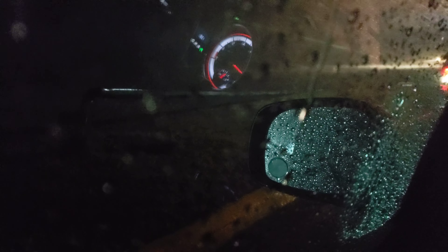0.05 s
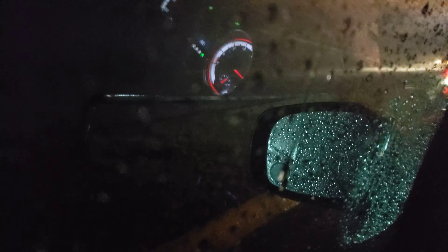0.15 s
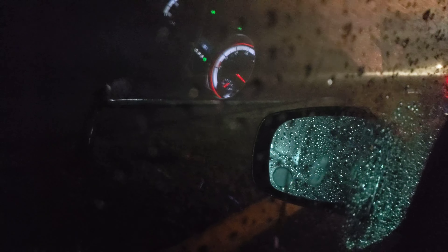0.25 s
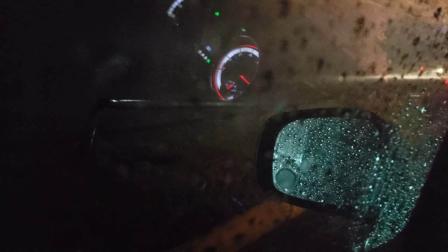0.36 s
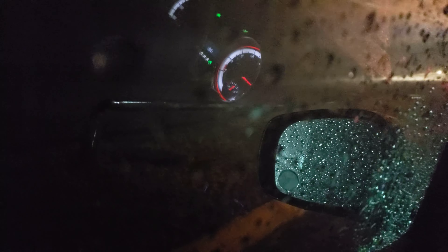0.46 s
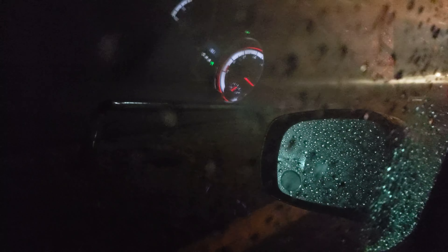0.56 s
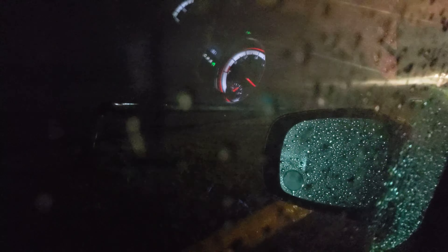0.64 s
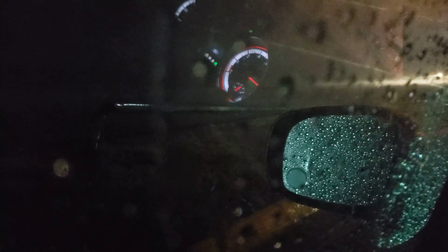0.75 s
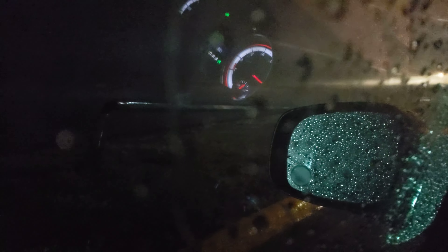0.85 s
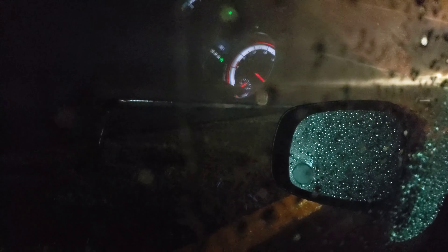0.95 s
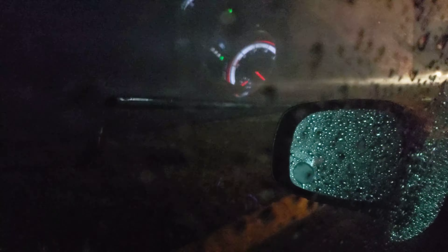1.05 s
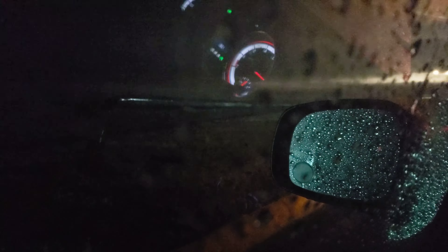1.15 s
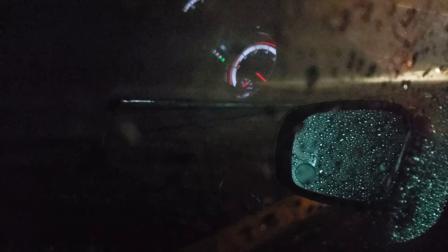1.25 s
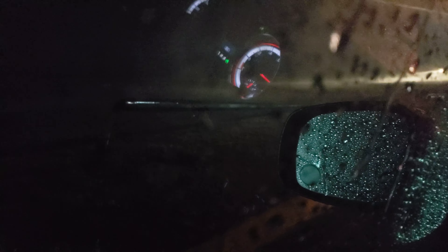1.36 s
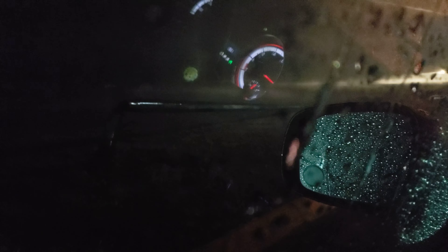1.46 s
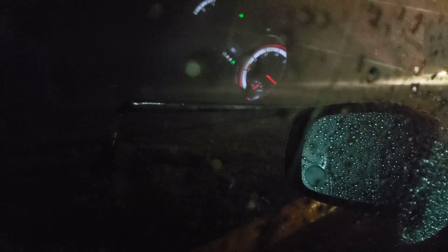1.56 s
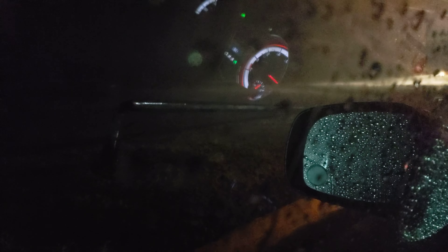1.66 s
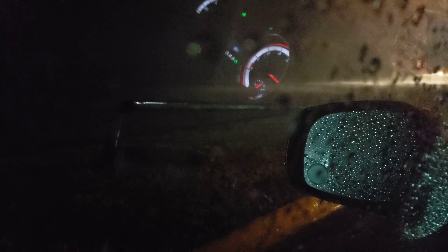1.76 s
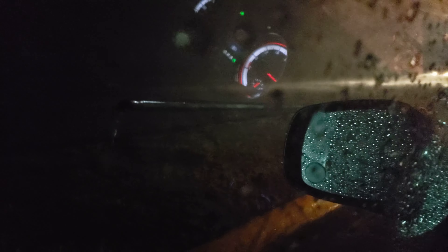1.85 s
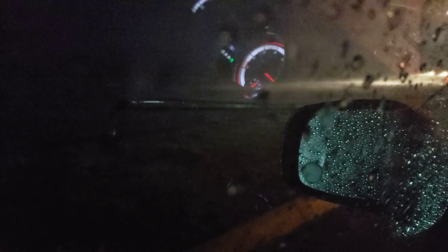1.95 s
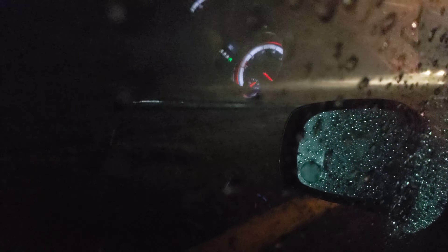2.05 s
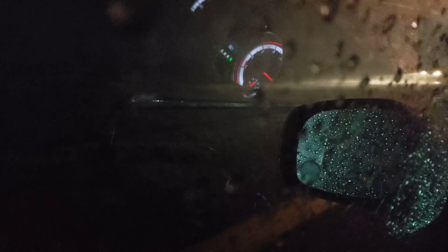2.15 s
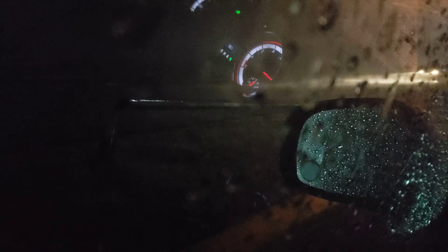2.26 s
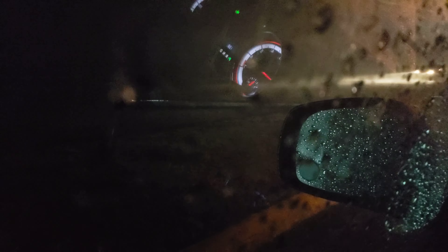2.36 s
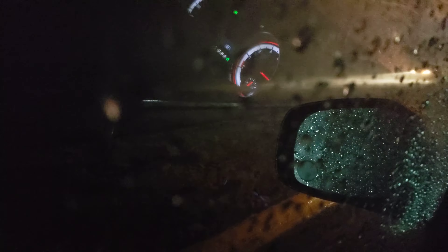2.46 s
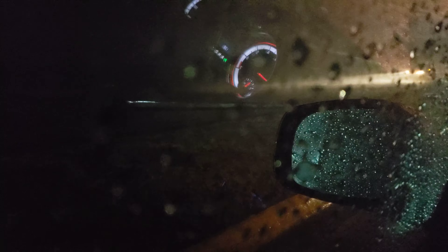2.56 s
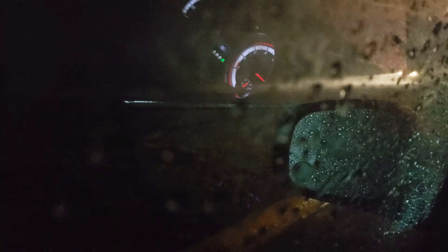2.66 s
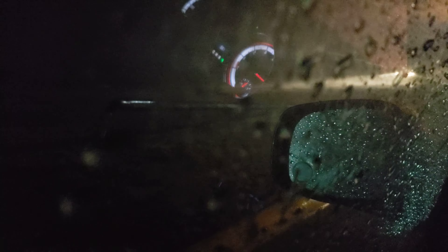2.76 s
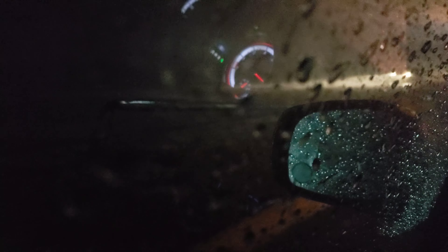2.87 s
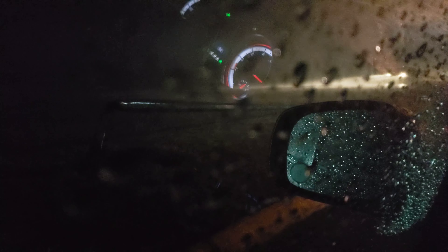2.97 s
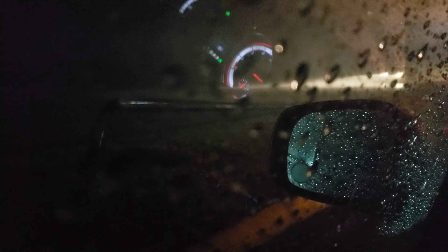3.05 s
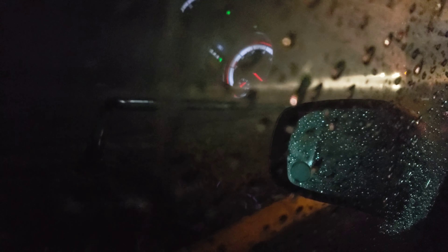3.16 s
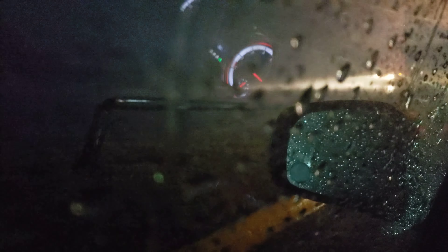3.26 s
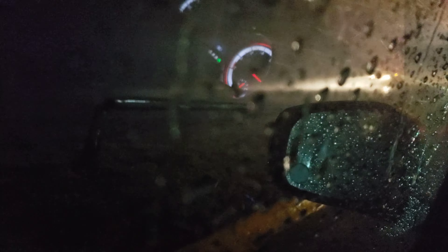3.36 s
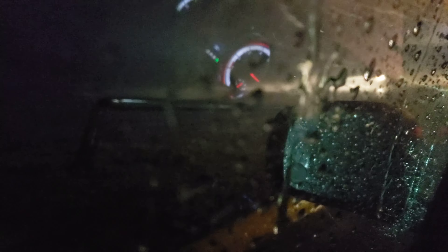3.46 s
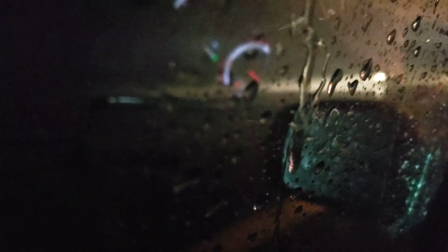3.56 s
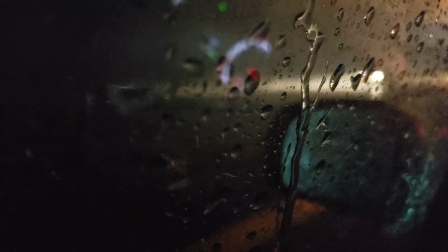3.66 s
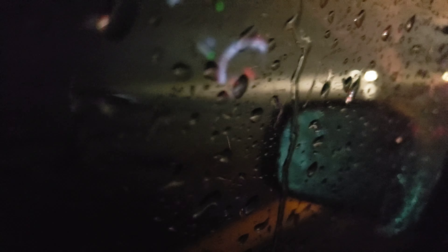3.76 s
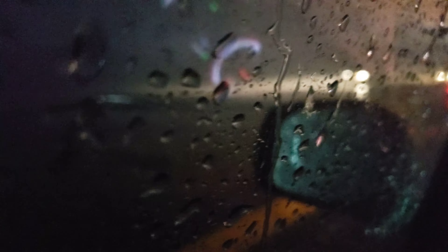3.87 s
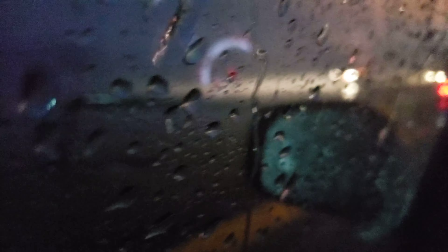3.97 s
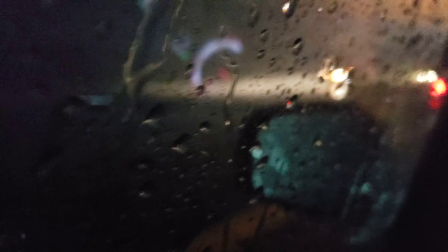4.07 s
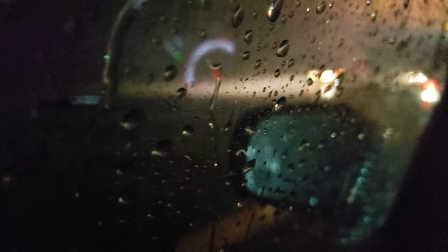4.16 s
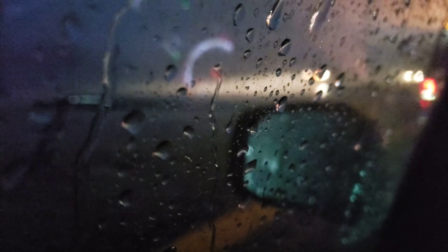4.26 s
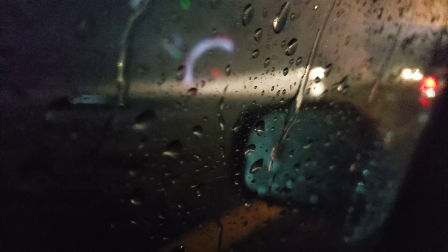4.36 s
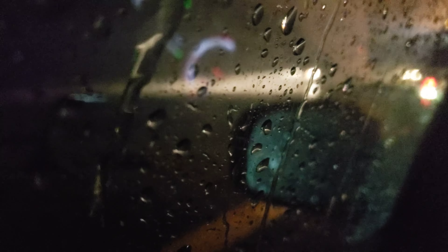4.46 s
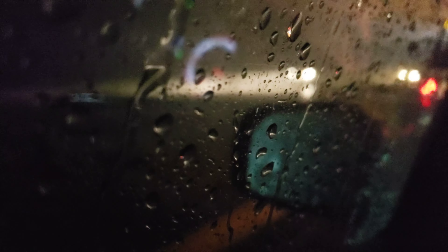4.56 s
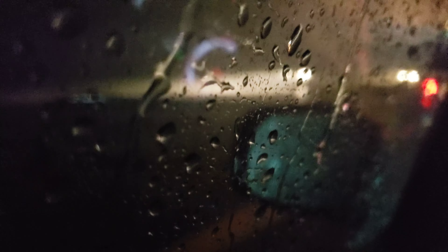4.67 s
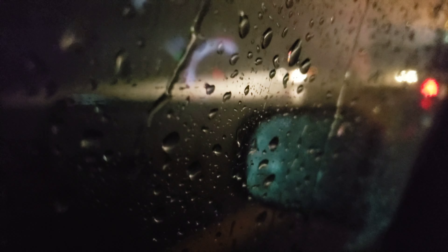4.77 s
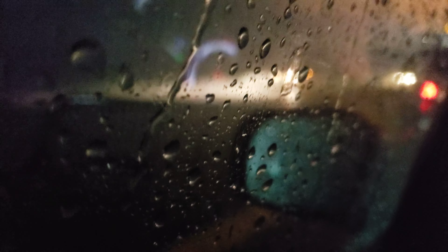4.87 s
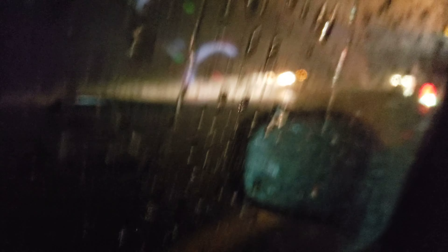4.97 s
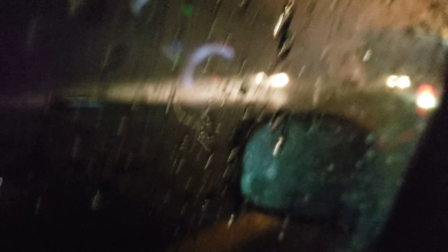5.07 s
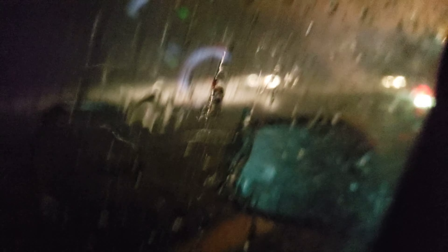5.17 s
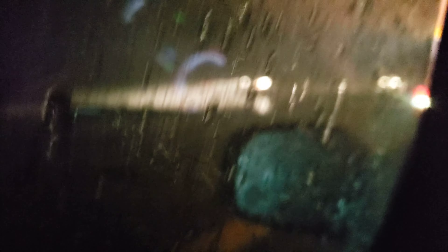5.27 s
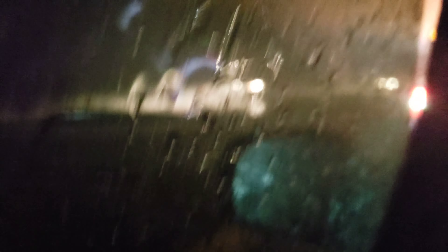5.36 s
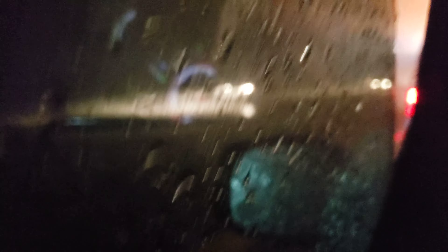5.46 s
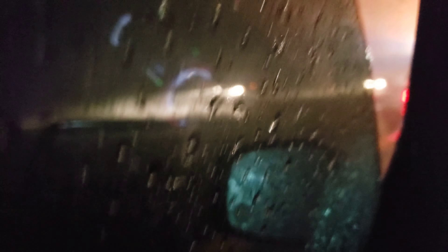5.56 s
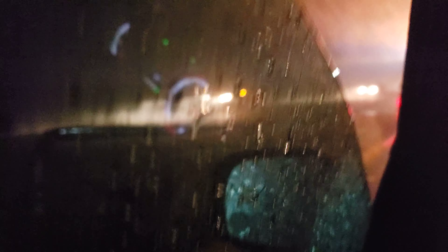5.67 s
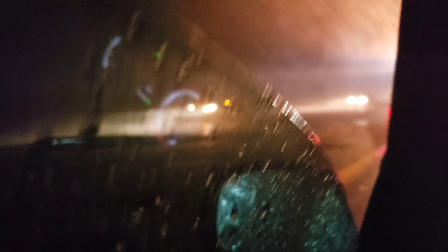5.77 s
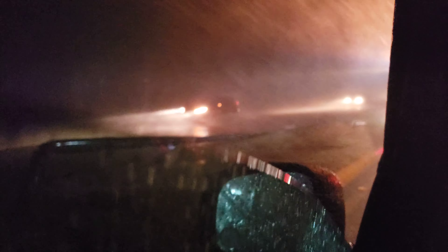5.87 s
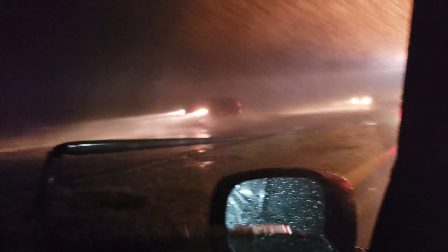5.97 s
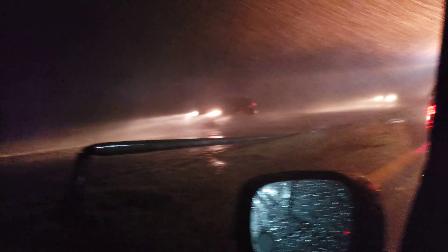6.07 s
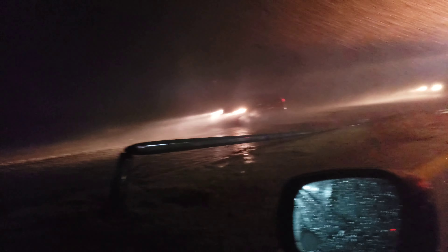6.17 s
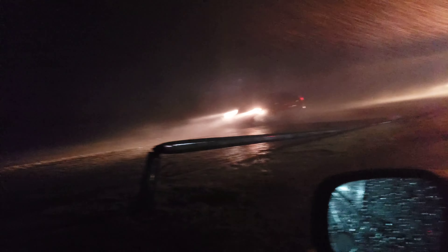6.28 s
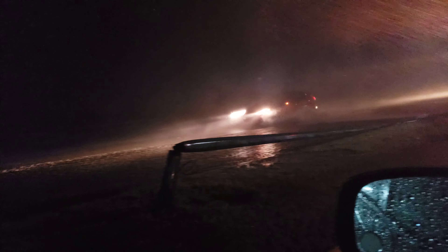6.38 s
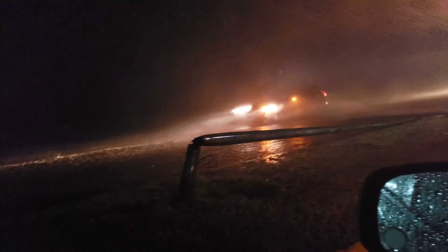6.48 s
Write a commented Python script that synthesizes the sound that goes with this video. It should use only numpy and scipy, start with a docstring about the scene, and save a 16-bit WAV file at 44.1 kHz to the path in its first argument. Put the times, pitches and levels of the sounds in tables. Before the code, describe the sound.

Close stereo cabin sound: rain hisses and spatters in gusts with brief lulls, crisp indicator clicks and dull wiper thuds above a soft drone. Late on, the door thuds as the window lowers, a breathy tone sings briefly in the gap, and rain rushes in. Drops pepper the microphone until a hard hit on the left leaves near silence.

```python
"""Sheets of rain burst on the glass of a vehicle at night, over a low rumble; an indicator relay ticks
and wipers thump as they turn. The side window is let down and the rain and air come in louder.
At last a drop lands on the left microphone port, and a limiter ducks all that follows to a whisper.
Rain is random impulses shaped by filters, rumble and air tone are filtered noise, and knocks and
ticks are impulses ringing damped modes."""
import sys
import numpy as np
from scipy import signal
from scipy.fft import rfft, irfft, next_fast_len
from scipy.io import wavfile
from scipy.ndimage import uniform_filter1d

SR = 44100
rng = np.random.default_rng(int(sys.argv[2]) if len(sys.argv) > 2 else 0)


def wav_record(signal):
    """Record a signal, one row per channel, as 16-bit PCM in the file named by sys.argv[1]."""
    frames = np.transpose(np.atleast_2d(signal))
    bounded = np.clip(frames, -1, 1)
    # unit amplitude maps onto the largest positive 16-bit level
    quanta = np.round(bounded * 32767).astype(np.int16)
    wavfile.write(sys.argv[1], SR, quanta)


N = 287612
TIME = np.arange(N) / SR   # seconds
FFT_SIZE = next_fast_len(N + SR // 4, real=True) // 2 * 2
BINS_HZ = np.maximum(np.arange(FFT_SIZE // 2 + 1) * SR / FFT_SIZE, 1)


def from_db(db):
    """Amplitude ratio: 20 dB is a factor of ten."""
    return 10 ** (np.asarray(db) / 20)


def rms(x):
    """Root mean square, the amplitude of equal power."""
    return np.sqrt(np.mean(x ** 2) + 1e-20)


def in_time(rows):
    """Linear interpolation of each column of a curve, at every sample."""
    seconds, *columns = np.transpose(rows)
    return [np.interp(TIME, seconds, column) for column in columns]


def per_bin(points):
    """Interpolation over log frequency, as pitch is heard, at every bin."""
    hz, value = np.transpose(points)
    return np.interp(np.log(BINS_HZ), np.log(hz), value)


def butter(x, hz, kind, order=2):
    """Butterworth filter: maximally flat in its passband."""
    return signal.sosfilt(signal.butter(order, hz, kind, fs=SR, output="sos"), x + 1e-18)


def ring(x, hz, t60):
    """Damped resonance: a unit click starts a sine of height 1 that falls 60 dB in t60 seconds."""
    radius, angle = from_db(-60 / (t60 * SR)), 2 * np.pi * hz / SR
    return signal.lfilter([0, np.sin(angle)], [1, -2 * radius * np.cos(angle), radius * radius], x + 1e-18)


def click(s, db):
    """Impulse: one sample, equal energy at all frequencies."""
    out = np.zeros(N)
    out[round(s * SR)] = from_db(db)
    return out


def drift(per_s):
    """Slow random fluctuation of RMS 1, with per_s new random values a second."""
    knots = rng.standard_normal(4096)
    slow = np.interp(TIME * per_s, np.arange(len(knots)), knots)
    return slow / rms(slow)


# Correlation of the ears. Each row: frequency in Hz, left-right likeness (limited to 1).
EAR_LIKENESS = [(60, 1.3), (240, 0.8), (480, 0.73), (950, 0.2), (1900, -0.1), (8000, 0)]
# Level difference of the ears. Each row: frequency in Hz, left minus right in dB.
EAR_BALANCE = [(60, 2.3), (240, 2.5), (480, 3.5), (950, 6), (1900, -1.5), (3800, -1), (6500, -7.5),
               (9800, 2.5), (12000, -9.5), (15000, -9)]


def in_cabin(pair, spectrum_db):
    """Interaural correlation: two unrelated signals are blended, alike in the bass, and filtered causally."""
    first, second = rfft(pair, FFT_SIZE)
    blend = np.arcsin(np.clip(per_bin(EAR_LIKENESS), -1, 1)) / 2
    ears = np.cos(blend) * np.array([first, second]) + np.sin(blend) * np.array([second, first])
    # folding the cepstrum gives the minimum-phase filter of this spectrum
    cepstrum = irfft(np.log(from_db(spectrum_db)))
    cepstrum[1:FFT_SIZE // 2] *= 2
    cepstrum[FFT_SIZE // 2 + 1:] = 0
    lean = from_db(per_bin(EAR_BALANCE) * np.array([[1], [-1]]) / 2)
    lean = lean / np.sqrt(np.mean(lean ** 2, axis=0))
    return irfft(ears * lean * np.exp(rfft(cepstrum)))[:, :N]


WINDOW_OPENS_S, WINDOW_TRAVEL_S = 4.925, 0.075


def window_opening():
    """Aperture as a share from 0 to 1, growing linearly."""
    return np.clip((TIME - WINDOW_OPENS_S) / WINDOW_TRAVEL_S, 0, 1)


# Sheets of rain thrown by gusts. Each row: time of full strength in seconds, patter level in dB,
# hold in seconds, rise in dB per second, fall in dB per second, extra fine spray in dB.
RAIN_SHEETS = [(0.01, -60.5, 0.009, 118, 89, 0), (0.30, -44, .2, 95, 65, 1),
               (0.681, -51, 0.0092, 120, 43, 0.5), (1.24, -55.5, 0.096, 39, 68, -1),
               (1.502, -62.3, 0.097, 49, 135, 0.5), (1.847, -45, 0.18, 215, 52, -2),
               (2.218, -37.5, 0.017, 220, 123, 1), (2.396, -44.5, 0.028, 99, 55, 2),
               (2.629, -40.5, .1, 276, 79, .5), (3.17, -52.5, 0.13, 150, 28.5, -1.5),
               (3.571, -48.5, .25, 40, 63, -0.5), (4.016, -56.5, .02, 100, 63, -1),
               (4.28, -56.5, .17, 160, 83, 5), (4.785, -55, 0.024, 41, 43, 1.5),
               (5.005, -42, 0.0079, 250, 111, -2), (5.177, -42.5, 0.12, 150, 48, -1),
               (5.63, -45, 0.033, 397.5, 100, 10.5), (5.69, -44, 0.022, 70, 100, -2),
               (5.99, -47.5, .5, 150, 40, 0)]
DRIZZLE_DB, INFLOW_DB = -79, -46   # rain between the sheets; rain blowing in at the open window
SPRAY_SHUT_DB, SPRAY_OPEN_DB = -8, -2.5   # fine spray against the patter


def sheets():
    """Addition of powers: sheets swell, hold and drain, giving gains of patter and fine spray."""
    opening = window_opening()
    patter = spray = from_db(DRIZZLE_DB) ** 2 + (from_db(INFLOW_DB) * opening) ** 2
    for s, db, hold, rise, fall, fine_db in RAIN_SHEETS:
        before, after = np.maximum(s - TIME, 0), np.maximum(TIME - s - hold, 0)
        level_db = db - rise * before - fall * after
        power = from_db(np.maximum(level_db, -150)) ** 2
        patter = patter + power
        spray = spray + power * from_db(fine_db) ** 2
    share_db = SPRAY_SHUT_DB + opening * (SPRAY_OPEN_DB - SPRAY_SHUT_DB)
    return np.sqrt(patter), np.sqrt(spray) * from_db(share_db)


def drops(per_s, spread_db, mist):
    """Shot noise: impacts of many sizes, each nearer one ear, over a mist too fine to tell apart."""
    sizes = from_db(spread_db * np.minimum(rng.exponential(1, N), 5)) * rng.choice([-1, 1], N)
    chance = np.clip(per_s / SR, 1e-4, 1)
    bearing = rng.uniform(0, 2 * np.pi, N)
    lands = rng.random(N) < chance
    impacts = sizes * lands / np.sqrt(chance)   # power does not depend on the rate
    hits = impacts * np.array([np.cos(bearing), np.sin(bearing)])
    return hits / rms(hits) + mist * rng.standard_normal((2, N))


# Spectra of the patter, window shut and open, and of the fine spray.
# Each row: frequency in Hz, relative level in dB per Hz.
SHUT_PATTER = [(120, 2), (300, 3.5), (620, 2), (900, -0.5), (1300, -1.5), (1800, -2.5), (2500, -3.5),
               (3300, -2), (4000, -5), (5000, -12), (6200, -15.5), (7500, -23), (9000, -21)]
OPEN_PATTER = [(90, -0.5), (300, -0.5), (620, 1), (900, -2), (1300, -1.5), (1800, -3.5), (2500, -5.5),
               (3300, -2.5), (4000, -6), (5000, -8.5), (6200, -14), (7500, -18.5), (9000, -23)]
FINE_SPRAY = [(6000, -45), (8000, -18), (8900, -7), (9600, 0.5), (10600, -1), (12500, 1), (14000, -6),
              (15700, -16.5), (17000, -35)]
# Lift of the spray through the open window. Each row: frequency in Hz, gain in dB.
OPEN_SPRAY_LIFT = [(12500, 2), (14000, 4.5), (15400, 8.5)]
# Glass and cabin resonances under the rain. Each row: frequency in Hz, width in Hz, boost in dB.
GLASS_RESONANCES = [(2098, 230, 6.5), (2825, 210, 3), (10640, 71, 6.5)]
# Heavy splats on the glass. Each row: start in seconds, patter level in dB and spray level in dB
# (both before SPLAT_LIFT_DB and the envelope), decay in seconds.
HEAVY_SPLATS = [(0.107, -49.5, -58, 0.01), (0.509, -39.5, -50, 0.01), (1.348, -48, -50.5, 0.0026),
                (2.054, -42, -48, 0.0054), (3.598, -40, -44, .011), (3.6847, -40, -35, 0.0035),
                (3.801, -44, -43, 0.0067), (4.775, -40, -44, 0.014), (5.591, -40, -34.5, 0.004),
                (5.745, -26, -31, 0.0016)]
SPLAT_LIFT_DB = 2.5


def rain(patter_gain, spray_gain):
    """Density of impacts: stronger gusts bring more drops, the open window a brighter sound, splats brief showers."""
    opening = window_opening()
    per_s = 4000 * (patter_gain / from_db(-48)) ** .7
    clumps = from_db(1.17 * drift(per_s=70) + 0.65 * drift(per_s=18))
    pane_db = sum(db / (1 + (2 * (BINS_HZ - hz) / width) ** 2) for hz, width, db in GLASS_RESONANCES)

    def through_window(impacts, shut_db, open_db):
        """Crossfade of transmission: from the colour of closed glass to that of the open gap."""
        shut = in_cabin(impacts, shut_db + pane_db)
        return (1 - opening) * shut + opening * in_cabin(impacts, open_db + pane_db)

    patter_drops = drops(per_s, spread_db=2.5, mist=0.79)
    patter = through_window(patter_drops, per_bin(SHUT_PATTER), per_bin(OPEN_PATTER))
    spray_drops, spray_db = drops(per_s, spread_db=3.0, mist=0.99), per_bin(FINE_SPRAY)
    spray = through_window(spray_drops, spray_db, spray_db + per_bin(OPEN_SPRAY_LIFT))
    patter = patter / rms(butter(patter, [1000, 7000], "band"))   # level set by the middle band
    for s, splat_db, splash_db, decay in HEAVY_SPLATS:
        age = np.clip((TIME - s) / decay, 0, 20)
        shower = np.exp(-age) - np.exp(-8 * age)   # the sheet of water spreads, then drains
        patter_gain = np.hypot(patter_gain, from_db(splat_db + SPLAT_LIFT_DB) * shower)
        spray_gain = np.hypot(spray_gain, from_db(splash_db + SPLAT_LIFT_DB) * shower)
    return clumps * (patter_gain * patter + spray_gain * spray / rms(spray))


# Spectrum of the drone in the cabin. Each row: frequency in Hz, relative level in dB per Hz.
CABIN_DRONE = [(12, -35), (20, -24), (40, -6), (90, -4.5), (157, -7.5), (265, -13.5), (340, -19),
               (476, -25), (517, -23), (612, -20.5), (736, -26), (870, -25), (1100, -45.5), (1430, -48),
               (2420, -120)]
# Engine and steady wind on the body. Each row: time in seconds, level in dB.
DRONE_LEVEL = [(0, -49), (1.7, -50), (2.4, -51.5), (3.0, -47), (3.7, -46.8), (4.2, -49.5), (5.0, -46.5)]
GUST_PUSH_DB, DRAUGHT_DB = -3, -47.5   # wind on the body against the patter; drone of the open window
BODY_LAG_S = .3   # the body feels only the long gusts


def rumble(gusts):
    """Low-pass inertia: the body drones and follows only long gusts; late on, wind buffets the left port."""
    push = uniform_filter1d(gusts, max(round(BODY_LAG_S * SR), 1)) * from_db(GUST_PUSH_DB)
    steady = from_db(in_time(DRONE_LEVEL)[0])
    draught = from_db(DRAUGHT_DB) * window_opening()
    level = np.sqrt(steady ** 2 + push ** 2 + draught ** 2)
    drone = in_cabin(rng.standard_normal((2, N)), per_bin(CABIN_DRONE))
    drone = drone / rms(drone) * level * from_db(1.84 * drift(per_s=12))
    buffet = butter(rng.standard_normal(N), [35, 190], "band")
    buffet_gain = from_db(-43.5 + 3 * drift(per_s=14)) * np.interp(TIME, [5.7, 5.95], [0, 1])
    return drone + buffet / rms(buffet) * buffet_gain * [[1], [0]]


# Indicator relay, each snap repeated once a blink. Each row: first time in seconds, impulse level in dB.
INDICATOR_SNAPS = [(.231, -48), (.578, -50)]
# Modes of the relay. Each row: frequency in Hz, relative level in dB, t60 in seconds.
RELAY_RESONANCES = [(2630, 0, 0.05), (2830, -8, .03), (3740, 2.5, .035), (3960, 0, .035), (5030, -6, 0.03),
                    (6010, -4.5, 0.022), (9900, -4, .015), (10600, 0, 0.022), (11700, 1, 0.022),
                    (12850, 2, .025), (13350, -1, .015)]
BLINK_S, RELAY_BRIGHT_DB = .6843, -1.5   # period; gain of modes above 8 kHz and of the contact noise


def relay(scatter_s, scatter_db):
    """Modal ringing and early reflections: a contact snaps to and fro, smeared by the nearby dashboard."""
    t = TIME[:SR // 20]
    reflections = rng.standard_normal((2, len(t))) * np.exp(-t / scatter_s)
    reflections = reflections / np.sqrt(np.sum(reflections ** 2, axis=1, keepdims=True))
    snaps = sum(click(s, db) for first, db in INDICATOR_SNAPS for s in np.arange(first, TIME[-1], BLINK_S))
    bright_snaps = snaps * from_db(RELAY_BRIGHT_DB)
    ticks = sum(from_db(db) * ring(bright_snaps if hz > 8000 else snaps, hz, t60)
                for hz, db, t60 in RELAY_RESONANCES)
    contact = 6 * butter(bright_snaps, [2200, 13000], "band")
    return from_db(scatter_db) * signal.fftconvolve((ticks + contact)[None], reflections)[:, :N]


def strike(blows, modes):
    """Modal excitation by a soft blow: the softer the contact, the duller the thump."""
    force = sum(butter(click(s, db), soft_hz, "low", order=1) for s, db, soft_hz in blows)
    thump = sum(from_db(db) * ring(force, hz, t60) for hz, db, t60 in modes)
    return butter(thump, 71, "high") * from_db([[3.5], [2.5]])   # left, right


# Turns of the wipers. Each row: time in seconds, gain in dB.
TURNS = [(1.300, -2.5), (2.845, -2.5), (4.3957, -2)]
# Knocks of blades and linkage in each turn. Each row: seconds after the turn, impulse level in dB
# before the gain of the turn, softness as a low-pass cutoff in Hz.
TURN_KNOCKS = [(-.11, -38, 200), (-.08, -33, 250), (-.06, -40, 200), (-.018, -31.5, 200),
               (.0015, -28.5, 690), (.011, -37.5, 600), (.043, -34, 150), (.062, -37.5, 150)]
# Modes of the body. Each row: frequency in Hz, relative level in dB, t60 in seconds.
BODY_MODES = [(96.7, -0.5, 0.19), (155, 0.5, 0.099), (212, -1, 0.052), (252, -28, .06), (374, -16.5, 0.11),
              (506, -9.5, 0.062), (607, -17.5, .08), (860, -23, 0.052), (1250, -20, 0.064)]


def wipers():
    """Structure-borne sound: each turn knocks the body into its modes."""
    blows = [(turn + s, turn_db + db, hz) for turn, turn_db in TURNS for s, db, hz in TURN_KNOCKS]
    return strike(blows, BODY_MODES)


# Knocks as the window starts down. Each row: time in seconds, impulse level in dB,
# softness as a low-pass cutoff in Hz.
WINDOW_KNOCKS = [(4.776, -43.5, 2500), (4.797, -36.5, 1200), (4.831, -36, 250), (4.861, -35.5, 2000),
                 (4.873, -52, 400)]
# Modes of the door. Each row: frequency in Hz, relative level in dB, t60 in seconds.
DOOR_MODES = [(90.6, -1, 0.21), (159.7, 0.5, 0.24), (253, -5, 0.072), (350, -9, 0.078), (488, -3.5, 0.058),
              (680, -15, 0.055), (1130, -14, 0.053)]


def door():
    """Structure-borne sound: knocks inside the door ring its modes."""
    return strike(WINDOW_KNOCKS, DOOR_MODES)


def strays():
    """Random arrivals: single drops come through the open window, each ticking close to one ear."""
    per_s, mean_db, spread_db = 16, -22.5, 2   # rate for both ears together
    lands = rng.random((2, N)) < per_s / 2 / SR * window_opening()
    sizes = from_db(mean_db + spread_db * np.clip(rng.standard_normal((2, N)), -2, 2))
    return butter(lands * sizes, [700, 14000], "band", order=1)


# Air singing in the window gap. Each row: time in seconds, frequency in Hz, level in dB.
SINGING_AIR = [(4.94, 2134, -80), (5.01, 2142, -42), (5.1, 2120, -51.5), (5.3, 2074, -51), (5.6, 2060, -56),
               (5.9, 2050, -82)]


def window_gap(width_hz):
    """Aeroacoustic resonance: turbulence rings the gap; the breathy tone sinks and fades once the window is open."""
    hz, db = in_time(SINGING_AIR)
    noise = rng.standard_normal((2, N)) + 1j * rng.standard_normal((2, N))
    eddies = butter(noise, width_hz / 2, "low")
    tone = np.real(eddies * np.exp(2j * np.pi * np.cumsum(hz) / SR))   # noise band moved up to the pitch
    return from_db(db) * tone / rms(tone)


# Drops that hit the microphone. Each row: time in seconds, tick level in dB, tick frequency in Hz,
# thud level in dB, thud length in seconds, side (0 left, 1 right).
MICROPHONE_DROPS = [(5.4952, -10.5, 1770, -13.5, 0.00064, 1), (5.549, -14.5, 12000, -30, .002, 1),
                    (5.590, -13, 13200, -20.5, 0.0032, 1), (5.671, -38, 3000, -18, 0.0048, 1),
                    (5.681, -10.5, 10100, -42, .002, 0), (5.749, -16, 2160, -23, 0.0012, 1),
                    (5.766, -12, 12500, -23, 0.0013, 0), (5.777, -37, 3000, -19, 0.044, 0),
                    (5.78, -22, 600, -13, .005, 0), (5.8596, -15, 1180, -21, 0.0027, 0),
                    (5.941, -6, 12400, -23, 0.0014, 0), (5.974, -19, 12000, -23, 0.0069, 0),
                    (5.9986, 24, 3840, 18.5, 0.022, 0), (6.156, -15, 3540, -24, 0.0012, 0)]


def port_drops(tick_t60, settle_hz, swing_turns, swing_s):
    """Impact and relaxation: a tick on the case, then the diaphragm swings out ever more slowly."""
    out, t = np.zeros((2, N)), TIME[:SR // 8]
    for s, tick_db, tick_hz, thud_db, length, side in MICROPHONE_DROPS:
        tick = np.sin(2 * np.pi * tick_hz * t) * from_db(-60 * t / tick_t60)
        turns = settle_hz * t + swing_turns * (1 - np.exp(-t / swing_s))
        thud = -np.sin(2 * np.pi * turns) * np.exp(-(t / length) ** 2)
        start = round(s * SR)
        # close enough to reach one port only
        out[int(side > .5), start:start + len(t)] += from_db(tick_db) * tick + from_db(thud_db) * thud
    return out


def scene():
    """Superposition of weather, vehicle and drops on the microphone."""
    patter_gain, spray_gain = sheets()
    weather = rain(patter_gain, spray_gain) + rumble(patter_gain)
    vehicle = relay(scatter_s=0.004, scatter_db=-1) + wipers() + door()
    at_window = strays() + window_gap(width_hz=92)
    on_microphone = port_drops(tick_t60=0.0011, settle_hz=54, swing_turns=0.61, swing_s=0.00137)
    return weather + vehicle + at_window + on_microphone


CEILING_DB, LOOK_AHEAD_S, CUTOFF_HZ = -.5, 0.0081, 15900


def record(dry):
    """Peak limiting with look-ahead: both channels duck together and stay down; the top is cut."""
    over_db = np.maximum(20 * np.log10(np.abs(dry).max(axis=0) + 1e-9) - CEILING_DB, 0)
    held_db = np.maximum.accumulate(over_db)   # never released
    ahead = max(round(LOOK_AHEAD_S * SR), 2)
    early_db = np.interp(np.arange(N) + ahead / 2, np.arange(N), held_db)
    duck_db = uniform_filter1d(early_db, ahead)
    low_pass = signal.ellip(10, .1, 80, CUTOFF_HZ, fs=SR, output="sos")
    return signal.sosfilt(low_pass, dry * from_db(-duck_db))


dry = scene()
out = record(dry)
wav_record(out)
```